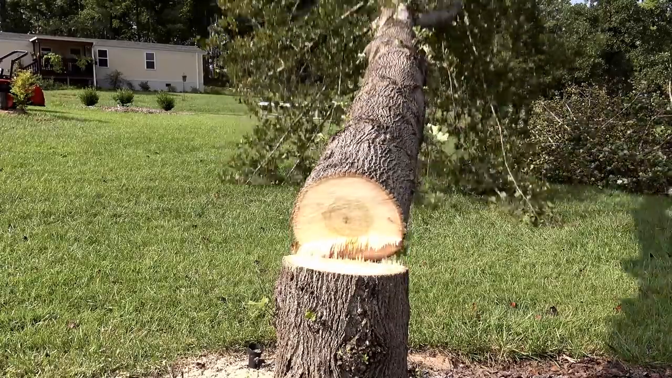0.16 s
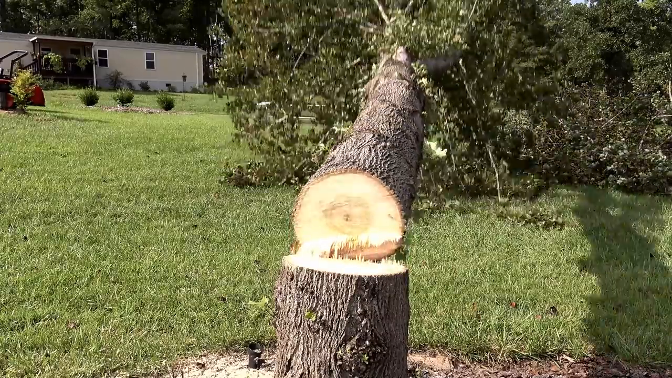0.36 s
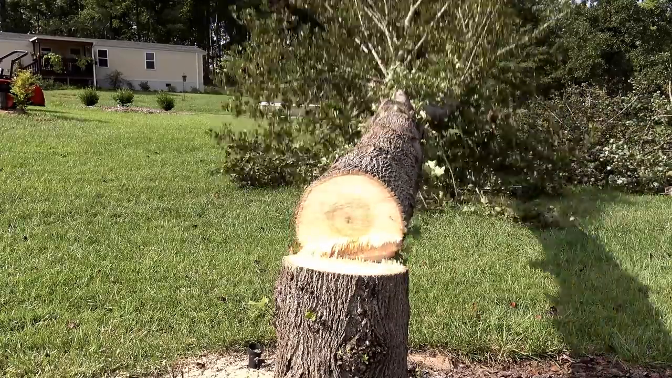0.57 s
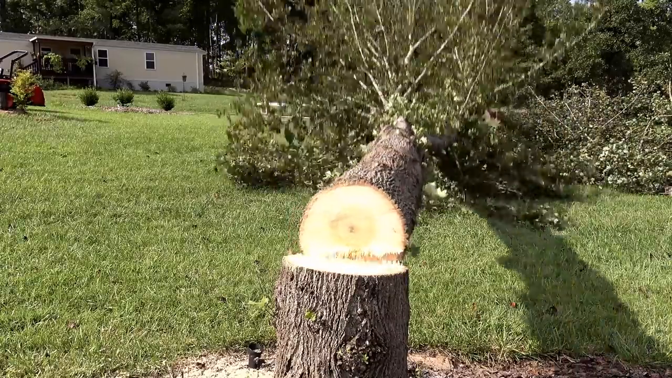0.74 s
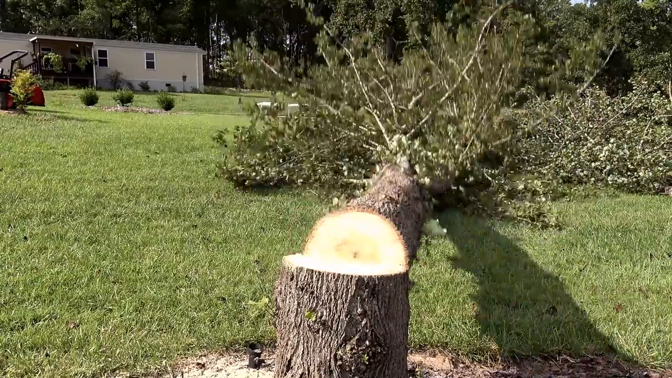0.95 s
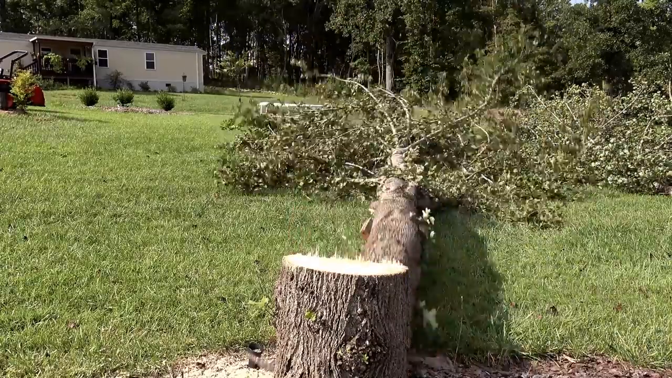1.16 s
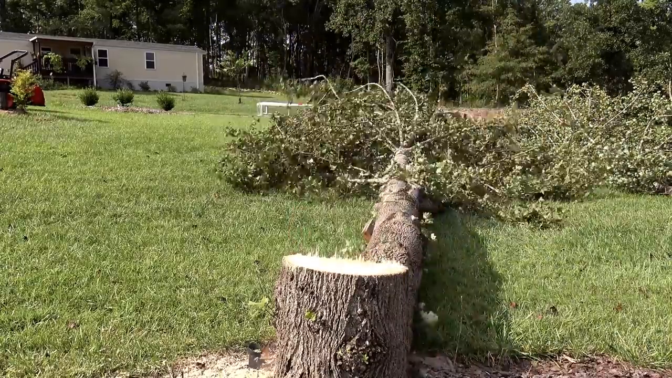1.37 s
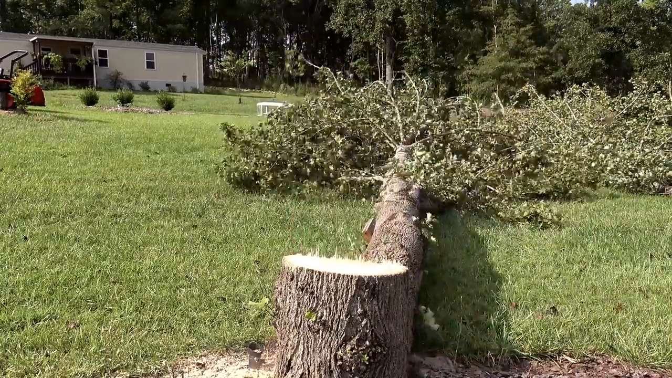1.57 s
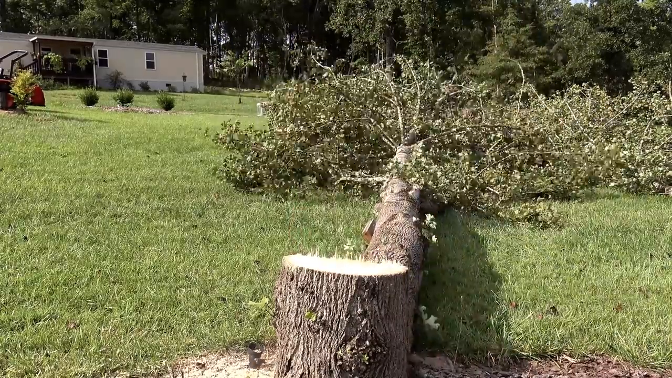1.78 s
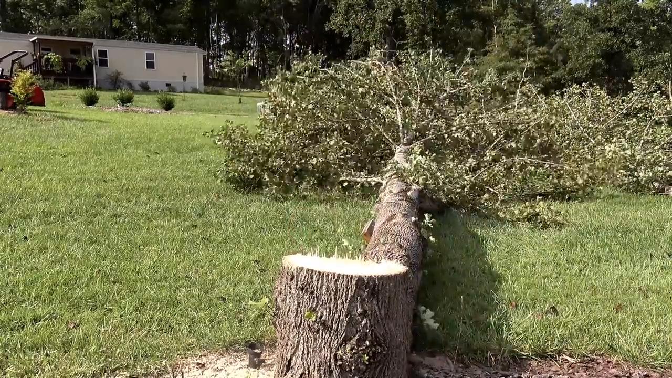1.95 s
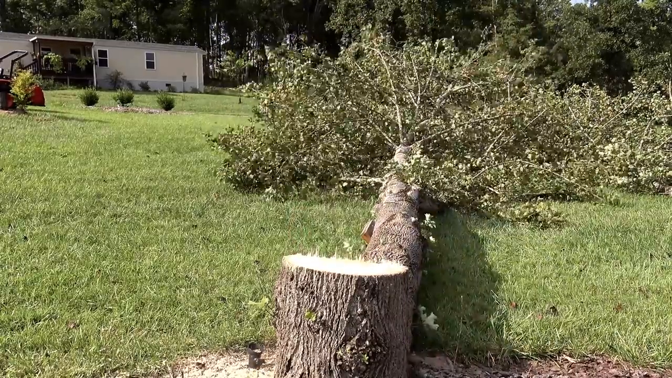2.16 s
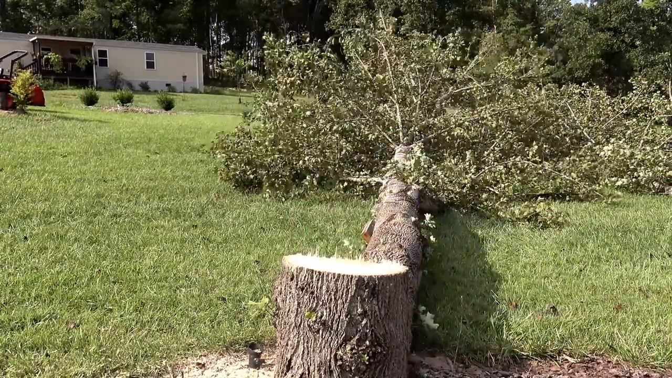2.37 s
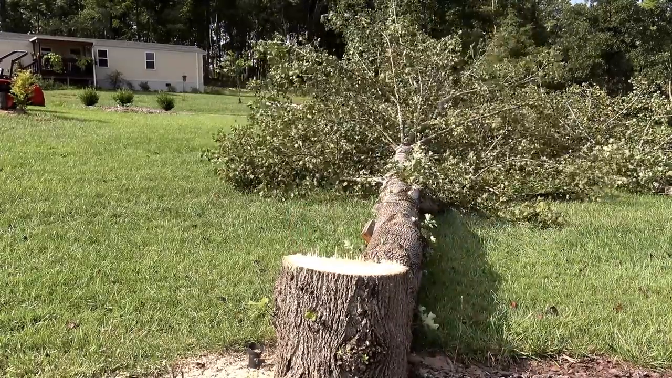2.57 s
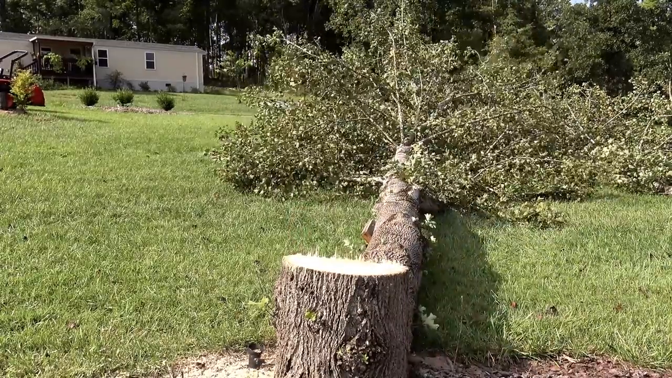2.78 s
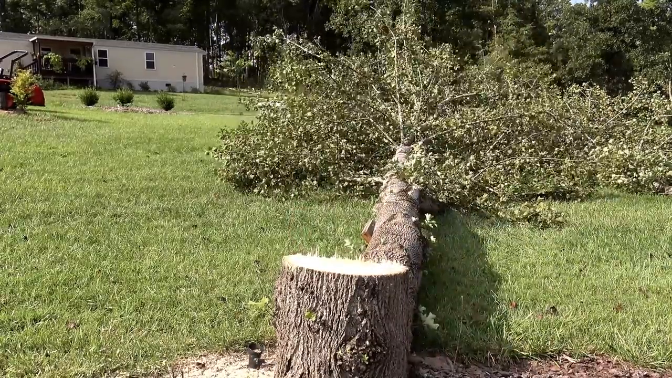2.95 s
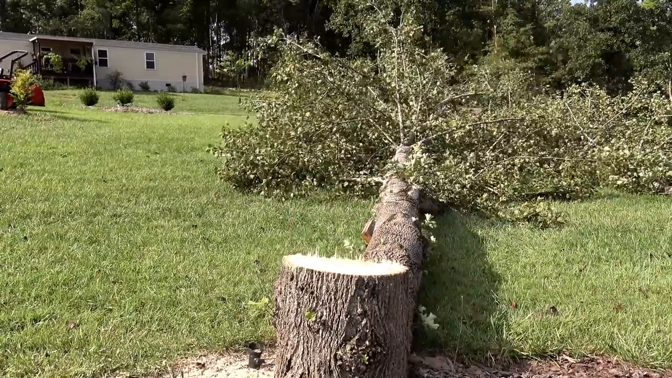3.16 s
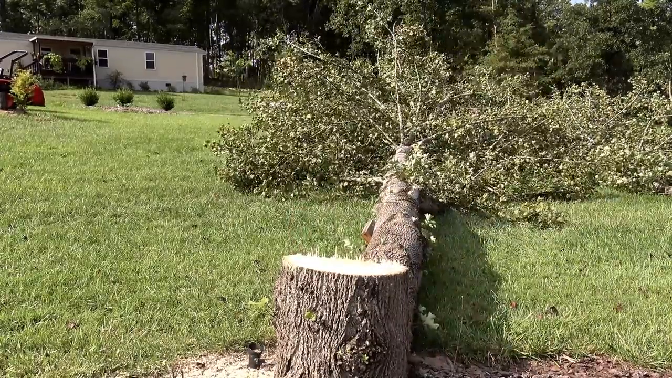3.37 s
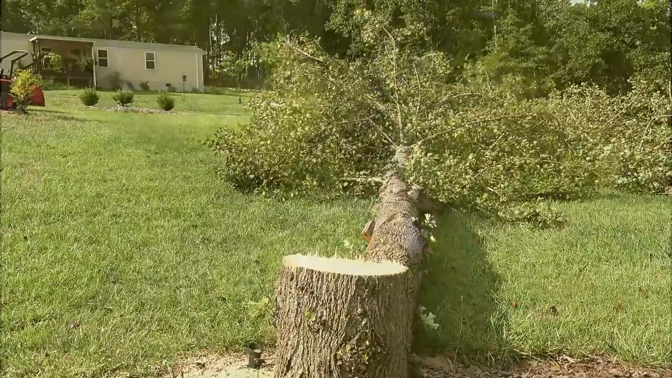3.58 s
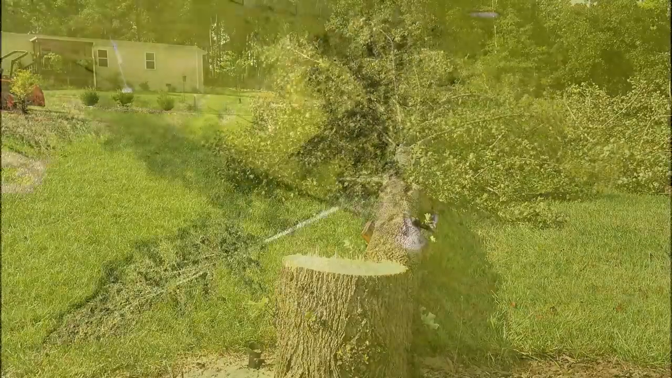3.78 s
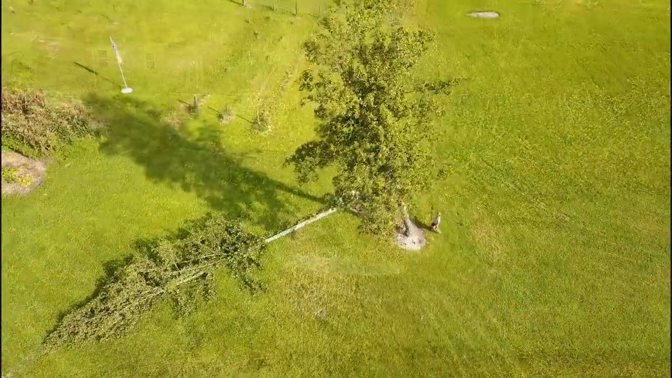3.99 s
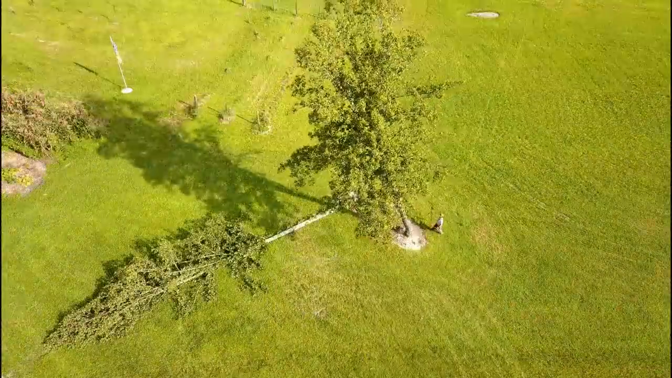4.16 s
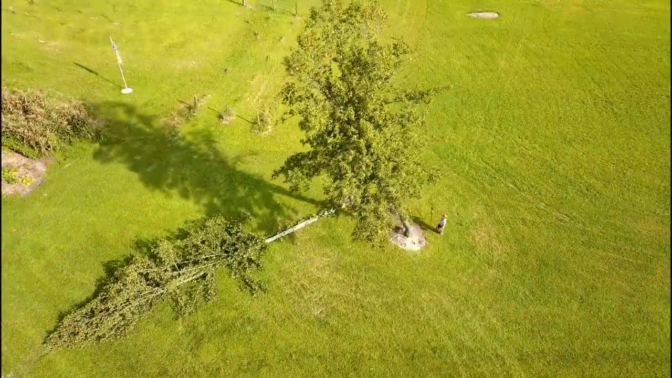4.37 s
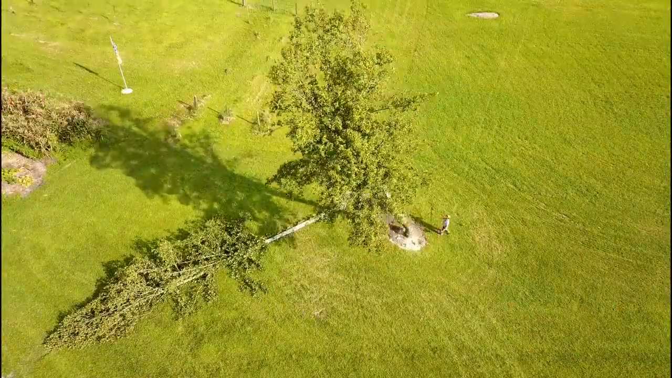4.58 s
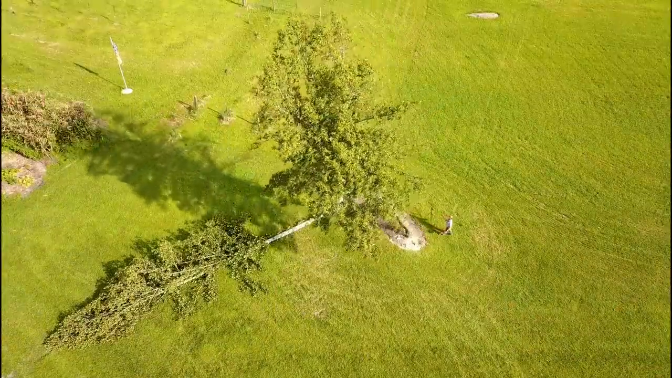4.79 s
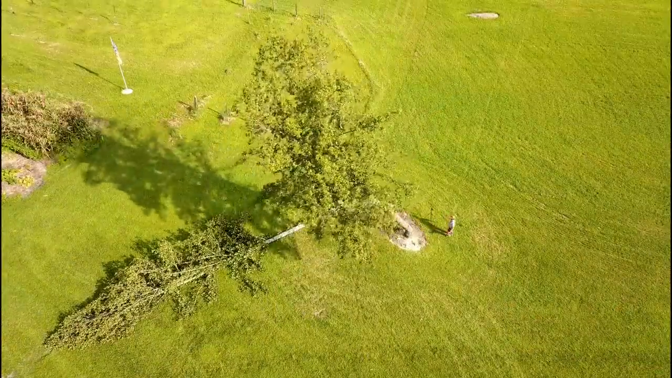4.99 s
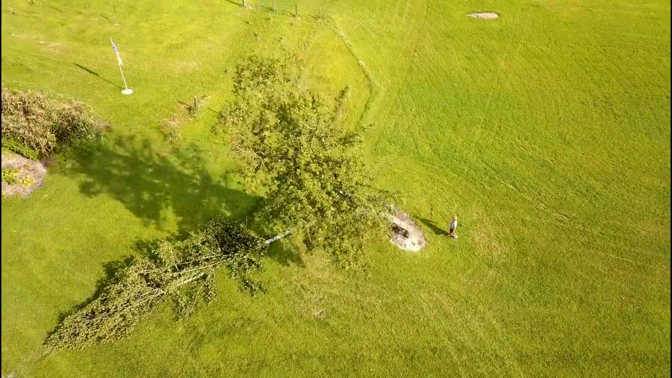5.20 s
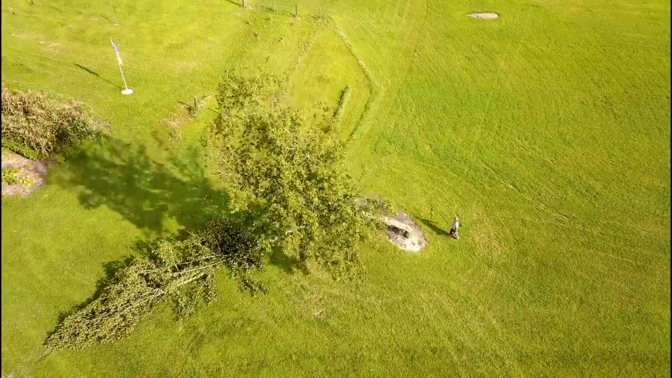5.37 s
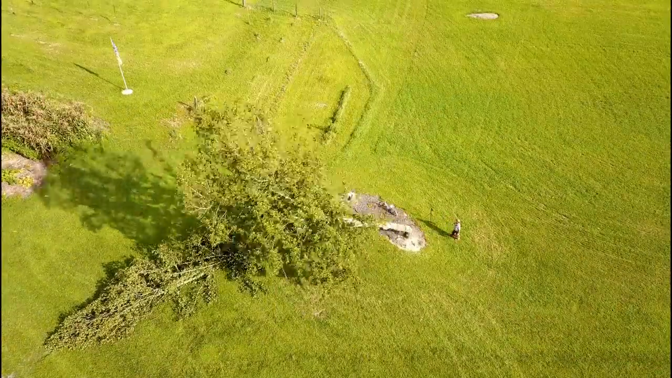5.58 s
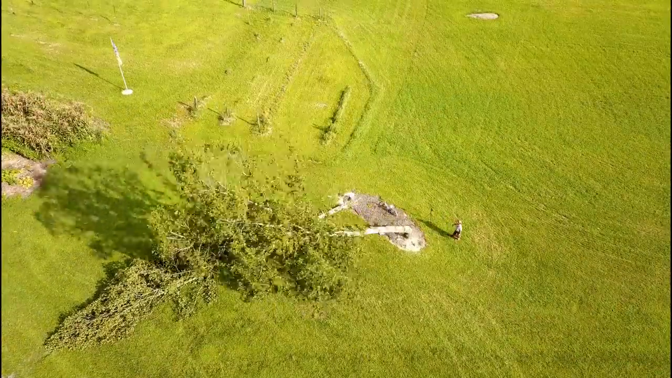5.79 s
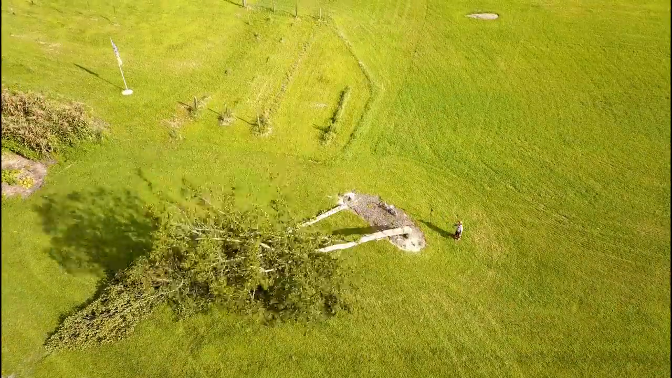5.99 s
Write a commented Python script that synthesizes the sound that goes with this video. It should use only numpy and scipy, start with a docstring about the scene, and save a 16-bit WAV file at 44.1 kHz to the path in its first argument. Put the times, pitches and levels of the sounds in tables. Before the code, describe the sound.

Open yard, outdoors. From 0 s a felled tree is already coming down at some distance: branches snap in ragged bursts, bright and leafy at first, woodier from about 0.45 s, over thrashing leaves and crackling twigs. The crash is densest from 0.5 to 1.3 s, with short downward-sweeping thumps near 0.7, 0.86 and 1.1 s and a low ground boom around 1.2 s. It drops after 1.5 s, with a few woody knocks near 1.6 s; leaves hiss and settle, with small snaps at 2.7 s and a weak knock at 3.7 s. A brief silence at 4.1 s, then a nearer, brighter microphone: thin insect chorus and faint far rumble. Isolated sharp fibre cracks begin at 4.2 to 4.4 s, thicken from 4.6 s, and become dense hollow splitting by 5.1 s. Dull jolts and a rush of crown and air peak near 5.45 s; cracking continues to the end, about 6.04 s.

```python
"""Branches snap in ragged bursts some way off as a felled tree lands crown first on a lawn; leaves thrash and settle.
After a short silence a nearer, brighter microphone hears another trunk split: single fibres crack, then volleys,
over insects, a far rumble and the rising rush of the crown.
Breaks are impulses and dying noise through causal colours; leaves, air and ground are coloured noise;
heavy landings are falling sweeps, as dispersive bending waves are."""
import sys
import numpy as np
from scipy import signal
from scipy.fft import rfft, irfft, next_fast_len
from scipy.io import wavfile
from scipy.ndimage import uniform_filter1d, map_coordinates

SR = 44100
rng = np.random.default_rng(int(sys.argv[2]) if len(sys.argv) > 2 else 0)


def store_wav(level_fs):
    """Save 16-bit WAV to argv[1]."""
    pcm = np.round(np.clip(np.atleast_2d(level_fs), -1, 1) * 32767)
    wavfile.write(sys.argv[1], SR, pcm.T.astype(np.int16))


N = 266364
TIME = np.arange(N) / SR  # s
FAR_ENDS, NEAR_STARTS = 4.1102, 4.1312  # s, with silence between

# Colour of thrashing leaves and of the bright part of a snap: (f/Hz, level per hertz/dB)
LEAF_COLOUR = [(880, -25), (1500, -7), (1960, -4.5), (2180, -14.5), (2390, -4.5), (3120, -6.5), (3750, 1),
               (5120, -11), (6150, -7.5), (7520, -11.5), (10100, -24.5), (13400, -45)]
# Colour of the body of a breaking fibre: (f/Hz, level per hertz/dB)
BODY_COLOUR = [(410, -24.5), (700, -5.5), (964, -4.5), (1210, -2), (2290, 2.5), (3310, -4), (3700, -20),
               (4810, -57), (8140, -120)]
# Colour of the sharp edge of a breaking fibre: (f/Hz, level per hertz/dB)
EDGE_COLOUR = [(2180, -34), (3700, -14.5), (4020, -1), (4280, 2), (5590, -1), (6760, 4.5), (8600, -12),
               (10600, -0.5), (13700, -15), (15900, -29), (16900, -58)]


def amp(db):
    """Level: decibels to an amplitude ratio."""
    return 10 ** (np.asarray(db) / 20)


def unit(x):
    """Normalisation to an rms of 1."""
    return x / np.sqrt(np.mean(x ** 2) + 1e-20)


def along(points, hz):
    """Spectral interpolation of (f/Hz, value) points on a logarithmic frequency axis."""
    f, v = np.transpose(points)
    return np.interp(np.log(hz + 1), np.log(f + 1), v)


def curves(rows):
    """Envelope interpolation: one value per sample for each column after the time."""
    s, *columns = np.transpose(rows)
    return [np.interp(TIME, s, column) for column in columns]


def wobble(rate):
    """Slow random modulation: a smooth curve through rate random knots a second."""
    knots = rng.standard_normal(int(N * rate / SR) + 4)
    return map_coordinates(knots, [np.arange(N) * rate / SR])


def filtered(x, response):
    """Linear filtering: the spectrum times a response of frequency, zero-padded."""
    size = next_fast_len(N + SR // 2)
    hz = np.fft.rfftfreq(size, 1 / SR)
    return irfft(rfft(x, size) * response(hz), size)[..., :N]


def struck(x, spectrum, size=2048):
    """Causality: a minimum-phase colour of energy 1, so that nothing rings before a blow."""
    hz = np.fft.rfftfreq(size, 1 / SR)
    (_, low_db), (_, high_db) = spectrum[0], spectrum[-1]
    points = [(0, low_db - 40)] + list(spectrum) + [(SR / 2, high_db - 40)]
    cepstrum = irfft(np.log(amp(along(points, hz))))
    # folding the cepstrum onto positive times gives minimum phase
    cepstrum[1:size // 2] *= 2
    cepstrum[size // 2 + 1:] = 0
    pulse = irfft(np.exp(rfft(cepstrum)))
    return signal.fftconvolve(x, pulse / np.linalg.norm(pulse))[:N]


def bursts(times, db, t60, spike, size, dull=None):
    """Impulsive release: at each time an inward spike and an exponentially dying puff, together of energy db."""
    t = np.arange(size) / SR
    shape = rng.standard_normal((len(times), size)) * amp(-60 * t / np.reshape(t60, (-1, 1)))
    if dull is not None:
        # each burst is tilted by chance; dull above 0 favours a blunter top
        tilt = 0.7 * np.tanh(np.reshape(dull, (-1, 1)) + 0.84 * shape[:, :1])
    shape[:, 0] = -spike
    if dull is not None:
        shape[:, 2:] += tilt * shape[:, :-2].copy()
    shape = shape / np.linalg.norm(shape, axis=1)[:, None]
    at = np.round(np.asarray(times) * SR).astype(int)[:, None] + np.arange(size)
    return np.bincount(at.ravel(), (amp(db)[:, None] * shape).ravel(), N + SR)[:N]


def grainy(rate, spread_db, t60):
    """Shot noise of rms 1: rate puffs a second at random times, many small and a few large."""
    place, size = rng.random((2, int(rate * N / SR)))
    return unit(bursts(place * N / SR, -spread_db * np.log(size + .02), t60, 1, size=512))


def rustle(spectrum, flutter_db, grain=0, **crackle):
    """Random friction and impacts: coloured noise with a power share of crackle, fluttering in level."""
    mix = rng.standard_normal(N)
    if crackle:
        grain = np.clip(grain, 0, 1)
        mix = np.sqrt(1 - grain) * mix + np.sqrt(grain) * grainy(**crackle)
    return amp(flutter_db * wobble(14)) * unit(struck(mix, spectrum, size=8192))


def crash():
    """Superposition: the crown hits the lawn, and one violence curve roughens leaves, twigs and ground together."""
    # Course of the fall: (t/s, leaves level/dB, twigs level/dB)
    fall = [(0, -29.5, -28.5), (.1, -28.5, -32.5), (.26, -28, -31), (.3, -24, -27), (.46, -20, -25),
            (.65, -21, -22.5), (.9, -21, -20), (1.1, -20.5, -19), (1.2, -22.5, -17.5), (1.33, -21.5, -23),
            (1.5, -25, -27), (1.72, -26.5, -30), (1.87, -32.5, -34.5), (2.3, -35.5, -39),
            (2.74, -36.5, -38.5), (2.92, -39, -42), (3.4, -42.5, -44), (4.11, -42.5, -41.5)]
    leaves_db, twigs_db = curves(fall)
    violence = np.clip((leaves_db + 45.5) / 25, 0, 1)
    impacts = snaps() + booms() + trunk(twigs_db, violence)
    return impacts + twigs(twigs_db, violence) + leaves(leaves_db, violence) + breeze()


def snaps():
    """Brittle fracture, smeared by distance: each break is a short puff with a bright and a woody part."""
    # Loudest branches: (t/s, bright energy level/dB, woody energy level/dB)
    branches = [(0.015, 9, -7), (0.066, 0, -9), (0.078, 8, 1.5), (0.083, 4.5, 4.5), (0.151, 1, -6),
                (0.274, 7, -5), (0.288, 7, -8), (0.335, 9, 3), (0.359, 9, 3.5), (0.38, 8, -9),
                (0.433, 9.5, -10), (0.443, -4, 5.5), (0.486, 0, 12.5), (0.507, 10, -6), (0.564, 7, 8),
                (0.587, 7, -8), (0.64, 2, 11), (0.653, 9, 6), (0.716, -6, 14.5), (0.784, -6, 5.5),
                (0.811, -5, 13), (0.864, 6, 11.5), (0.926, -3, 9), (0.985, 10, 11), (1.024, -7, 10),
                (1.191, 7.5, 12), (1.273, -12, 5), (1.568, -4, 3.5), (1.606, -11, 9), (1.615, -14, 10),
                (2.729, -2, -2), (2.779, -6, -16), (3.081, -24, -14), (3.692, -25, -4.5)]
    # Knock of a breaking limb: (f/Hz, level per hertz/dB)
    limb_colour = [(250, -22), (404, -4.5), (520, -8), (684, 1), (950, 0), (1400, -2), (2100, -18)]
    s, bright_db, woody_db = np.transpose(branches)
    # a snapped branch tears through a moment later, more weakly
    tear_delay, tear_db = .016, -6.5  # longest delay in s, dB re the snap
    s = np.r_[s, s + tear_delay * (.4 + .6 * rng.random(len(s)))]
    bright_db = np.r_[bright_db, bright_db + tear_db]
    woody_db = np.r_[woody_db, woody_db + tear_db]
    bright = struck(bursts(s, bright_db, 0.041, 6.8, size=2048, dull=0), LEAF_COLOUR)
    woody = struck(bursts(s, woody_db, .028, 3, size=2048), limb_colour)
    return bright + woody


def booms():
    """Dispersion: bending waves run along the wood, high pitches first, so each landing is a ragged falling sweep."""
    # Heavy limbs and the trunk land, before random roughness:
    # (t/s, first f/Hz, last f/Hz, length/s, peak level/dB)
    landings = [(0.075, 500, 420, 0.015, -20), (0.693, 600, 180, 0.029, -21),
                (0.86, 476, 129, 0.063, -19.5), (1.125, 623, 83, 0.15, -18.5)]
    out = np.zeros(N)
    rough = amp(2.5 * wobble(70))  # level
    ragged = np.exp(.2 * wobble(90))  # pitch
    for s, first_hz, last_hz, length, db in landings:
        start = round(s * SR)
        u = np.arange(int(length * SR)) / (length * SR)
        hz = last_hz + (first_hz - last_hz) * (1 - u) ** 2.5
        hz = hz * ragged[start:][:len(u)]
        sweep = np.sin(2 * np.pi * np.cumsum(hz) / SR)
        out[start:][:len(u)] += amp(db) * np.sqrt(np.sin(np.pi * u)) * sweep
    return out * rough


def trunk(twigs_db, violence):
    """Low-frequency impact radiation: trunk and ground swing wider than the twigs and boom as the trunk lands."""
    # Colour of trunk and ground: (f/Hz, level per hertz/dB)
    ground_colour = [(15, -47), (25, -7), (43, -5.5), (81, 0), (152, 0), (210, 1.5), (450, -8), (580, -27),
                     (990, -120)]
    lands, lands_db, lands_width = 1.23, 6, .08  # s, dB, s
    landing = np.exp(-((TIME - lands) / lands_width) ** 2)
    trunk_db = -37 + 1.15 * (twigs_db + 30.5) + lands_db * landing
    return amp(trunk_db) * rustle(ground_colour, grain=0.33 * violence, rate=150, spread_db=2.0,
                                  t60=0.024, flutter_db=2.5)


def twigs(twigs_db, violence):
    """Multiple small fractures: noise that crackles more as the fall grows violent."""
    # Colour of breaking twigs: (f/Hz, level per hertz/dB)
    twig_colour = [(180, -30.5), (300, -7), (511, 0), (556, 0.5), (1390, 2), (1940, -7.5), (2200, -12.5),
                   (2860, -43), (4840, -120)]
    return amp(twigs_db) * rustle(twig_colour, grain=0.16 + 0.43 * violence, rate=250, spread_db=3.5,
                                  t60=0.013, flutter_db=.5 + 1.3 * violence)


def leaves(leaves_db, violence):
    """Friction noise: hard thrashing crackles, settling leaves only hiss."""
    return amp(leaves_db) * rustle(LEAF_COLOUR, grain=.5 * violence, rate=830, spread_db=3.5,
                                   t60=0.0072, flutter_db=0.32 + 1.1 * violence)


def breeze():
    """Turbulence: a low rumble of air at the far ports."""
    # Colour of the moving air: (f/Hz, level per hertz/dB)
    breeze_colour = [(13, -31), (22, -1), (38, 3.5), (65, 0.5), (150, -5), (200, -31), (330, -120)]
    return amp(-50.5) * rustle(breeze_colour, flutter_db=-1.0)


def split():
    """Superposition: the nearer trunk cracks over small fibres, crown, air, insects and rumble."""
    # Course of the split: (t/s, crown rush level/dB, hiss level/dB)
    course = [(4.131, -47, -48), (4.35, -46, -45.5), (4.8, -44, -40), (5, -46, -44), (5.12, -35, -35),
              (5.26, -39, -42), (5.36, -36, -35), (5.44, -23, -30.5), (5.52, -33.5, -43), (5.64, -33, -41),
              (5.8, -35.5, -45.5), (6.04, -37.5, -43)]
    rush_db, hiss_db = curves(course)
    wood = fibres() + thuds() + small_fibres(rush_db)
    return wood + crown(rush_db) + air(hiss_db) + insects() + rumble()


def fibres():
    """Brittle fracture: each fibre is a spike with a short puff, sounding body, edge and the hollow of the split."""
    # Single cracks of fibres, strong ones and isolated weak ones:
    # (t/s, body energy level/dB, edge energy level/dB)
    breaks = [(4.2205, -32, -14.5), (4.392, -3, -1), (4.4165, -32, -16.0), (4.4868, -27, -5.5),
              (4.565, -12, -9.5), (4.5763, -2.5, 5.5), (4.6103, -18, -5.5), (4.6353, -25.0, -11),
              (4.652, -5.0, 1), (4.6571, 0, 3.5), (4.6631, -6.5, 1), (4.6661, -1.0, 1), (4.6894, -9.0, 2.0),
              (4.6983, 1.5, 0), (4.7095, -10.0, 0.0), (4.721, -0.5, -2.5), (4.7686, -20.0, -10),
              (4.7834, 2, -2), (4.7935, 5.5, 1.5), (4.835, -2.5, -3.5), (4.8443, -4, -1), (4.8564, -2, 3.5),
              (4.8638, -8, -1.5), (4.8732, 1, 1.5), (4.8771, 6.5, -1.0), (4.9087, -4, 0.5),
              (4.9164, 3, 0.5), (4.925, -15, -2), (4.9455, -4, 4.5), (4.975, 0.5, 4.5), (4.9957, -10.0, -4),
              (5.0175, -6, 5), (5.0223, -0.5, 2), (5.0494, -9, -5), (5.0687, 7.5, 4.5), (5.0729, -2, 4),
              (5.1052, -1, 0.0), (5.1144, 1, 2.5), (5.127, 4.0, -2), (5.1344, -5.0, 1.0), (5.1406, 5.5, 1),
              (5.1444, 2, 2.5), (5.1486, 6, -4.0), (5.1645, 6, 6.5), (5.173, 1.5, 6), (5.1936, 4, 2),
              (5.199, -1, -3.0), (5.217, 1, 2), (5.2295, -1, -6), (5.2327, 6.5, -10), (5.2453, -0.5, 1.5),
              (5.2676, -3, 2), (5.2752, -10.0, 0), (5.2842, -15.0, 3), (5.302, -5, -4), (5.312, -8, 3),
              (5.3174, -3, 1), (5.3306, -2, 1), (5.34, -1, -5), (5.3443, 0, -2), (5.354, 3.0, 5),
              (5.37, 1, 4), (5.3901, 7.5, 2.5), (5.3998, 5.5, 3.5), (5.422, 6, 3), (5.432, 4, -5.0),
              (5.4378, 7.0, -4), (5.4442, 11, -3.0), (5.4486, 6.0, -4.0), (5.4615, 2, 0), (5.4652, -1, 2.5),
              (5.4781, 12, -8), (5.4934, -3, 2), (5.503, 3, -3), (5.5128, 7.5, 2), (5.5197, 1, -5.0),
              (5.5288, 6.5, -12), (5.546, 4.0, 1), (5.5716, 3, -5), (5.5745, 3, 3.5), (5.5953, -1, 1),
              (5.6028, 7.5, 0), (5.614, 5.5, -6), (5.6202, 7.5, -12), (5.6443, -7.0, 3), (5.6533, 0.5, -11),
              (5.6633, -1.0, -4), (5.6801, 6.5, -5), (5.6969, 5, -1), (5.7109, 0.0, -1.5), (5.7328, -1, -1),
              (5.7385, 6, -4), (5.7683, 0.5, -1), (5.7898, -2.0, 1.0), (5.7966, 2.5, -7), (5.8111, 3.5, -5),
              (5.839, -1.0, -1), (5.8432, 3.5, -3), (5.8584, 6, -3.0), (5.8747, 2, -4), (5.8906, 1.0, -1),
              (5.8962, -4, -3.5), (5.9011, 4.5, -12.0), (5.93, 5.0, -9), (5.9438, -7, 1), (5.9561, 3.5, 1),
              (5.9811, 2.5, -2), (5.9887, -4, -10.0), (6.0117, -15, 4.0), (6.018, -4, -9), (6.036, 3, 0)]
    # Ring of the opening split: (f/Hz, level per hertz/dB)
    hollow_colour = [(290, -24.5), (500, -5), (660, -2.5), (850, -6.5), (1350, -21)]
    s, body_db, edge_db = np.transpose(breaks)
    # the hollow rings louder as the split opens, follows the body and scatters by chance
    opening_db = -16.5 + 11.5 * (s - 5)  # grows in dB per s
    hollow_db = opening_db + 0.63 * body_db + 4 * rng.standard_normal(len(s))
    body = struck(bursts(s, body_db, 0.0027, 3.9, size=256), BODY_COLOUR)
    edge = struck(bursts(s, edge_db, 0.0018, 3.5, size=256, dull=(body_db - edge_db) / 15), EDGE_COLOUR)
    hollow = struck(bursts(s, hollow_db, 0.0022, 9, size=256), hollow_colour)
    # a break pulls four weaker neighbours along within some milliseconds
    wait, body_size, edge_size = rng.random((len(s), 4, 3)).T
    s2 = (s + 0.0018 + .018 * wait).ravel()
    body2_db = (body_db - 25.5 + 15 * body_size).ravel()
    edge2_db = (edge_db - 26 + 15 * edge_size).ravel()
    body2 = struck(bursts(s2, body2_db, 0.004, 2.6, size=256), BODY_COLOUR)
    edge2 = struck(bursts(s2, edge2_db, 0.0013, 2.3, size=256, dull=.3), EDGE_COLOUR)
    cracks = body + edge + hollow + body2 + edge2
    # the ground and the splinters answer each crack with a short tail
    t = np.arange(2048) / SR
    tail = uniform_filter1d(rng.standard_normal(2048), size=2) * amp(-60 * t / 0.018) * (t > .001)
    return cracks + amp(-13) * signal.fftconvolve(cracks, tail / np.linalg.norm(tail))[:N]


def thuds():
    """Damped low-frequency impulses: soft jolts as the trunk shifts on its stump."""
    # Jolts of the trunk: (t/s, energy level/dB, decay time t60/s)
    jolts = [(4.856, -4, .003), (5.135, -15, .03), (5.437, -3, .04), (5.459, -2, .04)]
    s, db, t60 = np.transpose(jolts)
    colour = [(40, -16), (80, 1), (180, -1.5), (350, -4.0), (600, -21)]  # (f/Hz, level per hertz/dB)
    return -struck(bursts(s, db, t60, 6.9, size=4096), colour, size=8192)


def small_fibres(rush_db):
    """Shot noise of many weak fractures: small fibres wake as the strain grows with the crown's rush."""
    ticks = grainy(rate=320, spread_db=8.0, t60=0.0025)
    small_db = -36 + 1.8 * np.minimum(rush_db + 37.0, 0) + 0.65 * np.maximum(rush_db + 38.5, 0)
    return amp(small_db) * unit(struck(ticks, BODY_COLOUR) + amp(1.5) * struck(ticks, EDGE_COLOUR))


def crown(rush_db):
    """Broadband flow and friction noise: the rush of the crown, with a share of crackle."""
    # Colour of the crown: (f/Hz, level per hertz/dB)
    rush_colour = [(180, -33.5), (300, -3.5), (662, 2), (1090, -4.5), (1660, -3), (3080, -7.5), (3630, -21),
                   (4000, -6.5), (5200, -19), (8800, -120)]
    return amp(rush_db) * rustle(rush_colour, grain=0.16, rate=600, spread_db=4.0, t60=0.0065, flutter_db=2.5)


def air(hiss_db):
    """High-frequency turbulence: hiss of air and leaves."""
    # Colour of air and leaves: (f/Hz, level per hertz/dB)
    hiss_colour = [(1500, -32), (2500, -7), (3700, -2), (5300, -1), (7000, 4.5), (8600, -3), (11000, -0.5),
                   (15400, -9), (16500, -33)]
    return amp(hiss_db) * rustle(hiss_colour, flutter_db=2.5)


def insects():
    """Incoherent summation: a steady chorus merges into narrow-band noise."""
    # Colour of the chorus: (f/Hz, level per hertz/dB)
    chorus_colour = [(6350, -13), (6830, 1), (7350, -22)]
    return amp(-51) * rustle(chorus_colour, flutter_db=.4)


def rumble():
    """Low-pass noise: a far rumble that fades at a constant rate under its flutter."""
    # Colour of the far rumble: (f/Hz, level per hertz/dB)
    rumble_colour = [(15, -56), (25, -26), (39, -13), (60, -3.5), (182, -5), (220, -10), (350, -30),
                     (460, -39), (770, -120)]
    start_db, fade = -49.5, 2  # dB, dB per s
    return amp(start_db - fade * (TIME - NEAR_STARTS)) * rustle(rumble_colour, flutter_db=4.0)


def soft(x, top):
    """Saturation: peaks near top are softly limited."""
    return x / (1 + np.abs(x / top) ** 4) ** (1 / 4)


def stereo(x, side_db, lean):
    """Stereo: shared sound with a lean by band and a faint phase-scrambled side."""
    z = signal.stft(x, nperseg=256)[2]
    z = z * np.exp(2j * np.pi * rng.random(z.shape))
    scrambled = signal.istft(z, nperseg=256)[1][:N]
    side = filtered(scrambled, lambda hz: amp(along(side_db, hz)))
    leaning = filtered(x, lambda hz: amp(np.outer([.5, -.5], along(lean, hz))))
    return leaning + np.outer([1, -1], side)


def scene():
    """Reception: two microphones in turn, each saturating softly on its loudest peaks."""
    # Level difference of the far ports by band: (f/Hz, left minus right level/dB)
    far_lean = [(80, 1.5), (240, -4), (600, 0.8), (1700, -1.3), (2400, -0.5), (4500, -1.4), (7500, -0.5)]
    # Side level by band, far microphone: (f/Hz, side level re mid/dB)
    far_side = [(100, -20), (300, -14), (900, -41), (1700, -21), (2500, -43), (3200, -19), (5100, -11),
                (7500, -25)]
    # Level difference of the near ports by band: (f/Hz, left minus right level/dB)
    near_lean = [(100, 1.2), (450, -0.8), (1000, -0.14), (7300, -0.1), (8600, -1), (10000, 0.1)]
    # Side level by band, near microphone: (f/Hz, side level re mid/dB)
    near_side = [(60, -15), (250, -17), (500, -17), (1700, -30), (3700, -55), (7300, -21), (8600, -7),
                 (10300, -24), (15000, -25)]
    far_top = 13400  # Hz, band limit of the far microphone
    far = filtered(soft(crash(), top=.7), lambda hz: hz < far_top)
    far = stereo(far, far_side, far_lean)
    near = stereo(soft(split(), top=.9), near_side, near_lean)
    # 1 ms fades on both sides of the silence
    far_fade = np.clip((FAR_ENDS - TIME) * 1000, 0, 1)
    near_fade = np.clip((TIME - NEAR_STARTS) * 1000, 0, 1)
    return far * far_fade + near * near_fade


def record(dry):
    """Band limitation: nothing is kept above 16.9 kHz."""
    return filtered(dry, lambda hz: hz < 16900)


dry = scene()
out = record(dry)
store_wav(out)
```